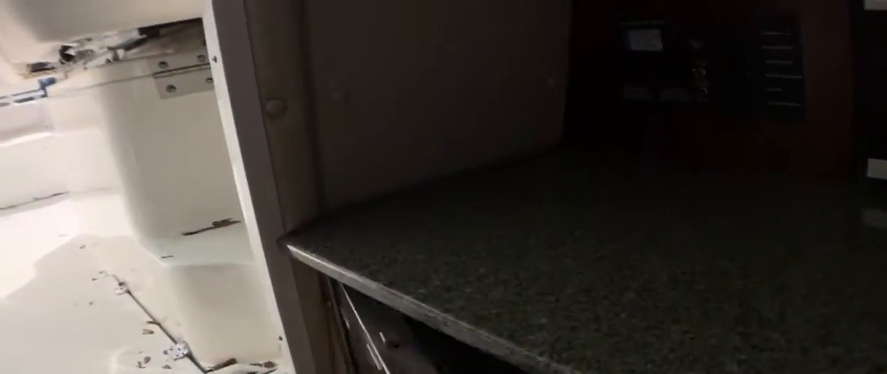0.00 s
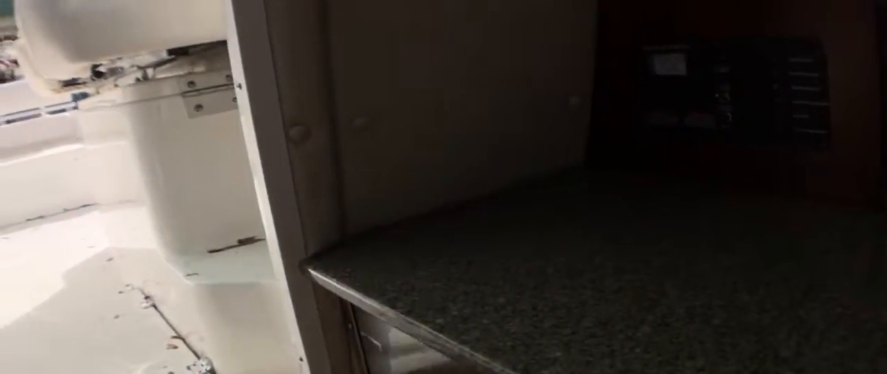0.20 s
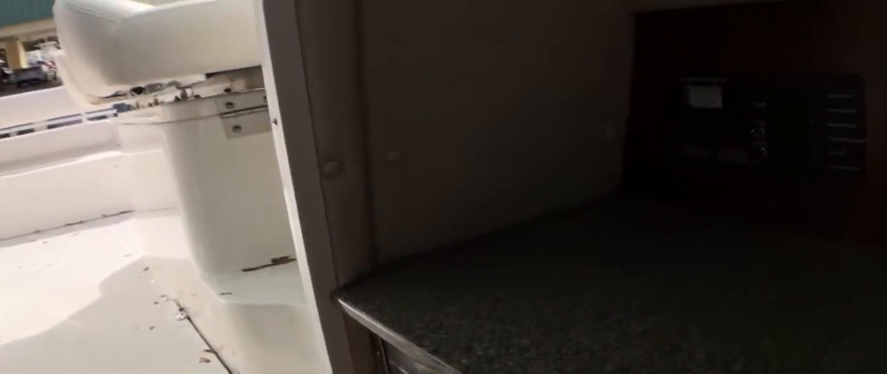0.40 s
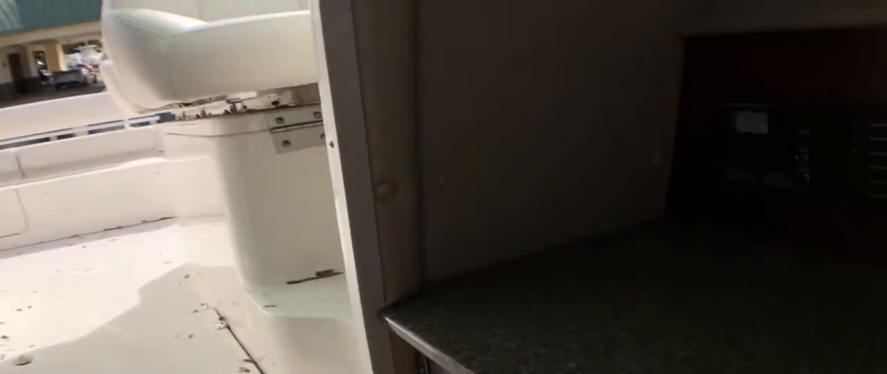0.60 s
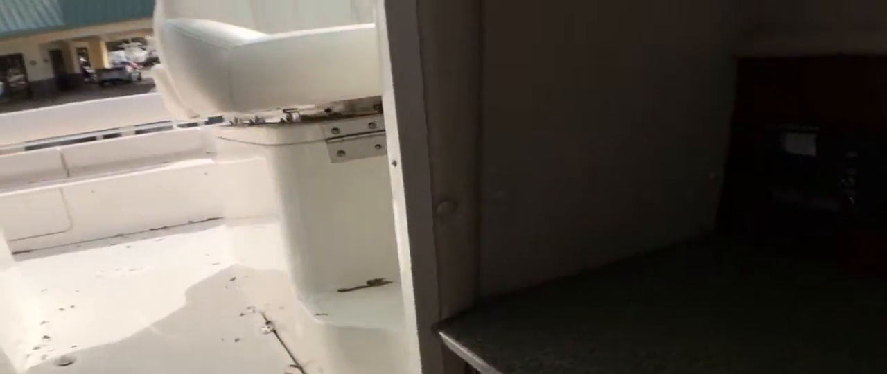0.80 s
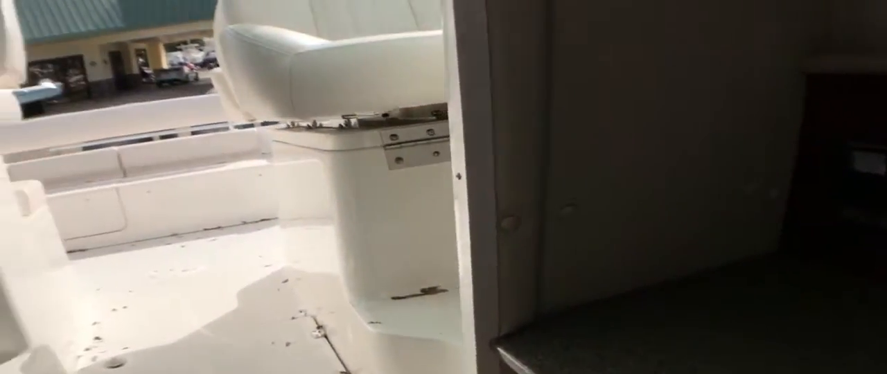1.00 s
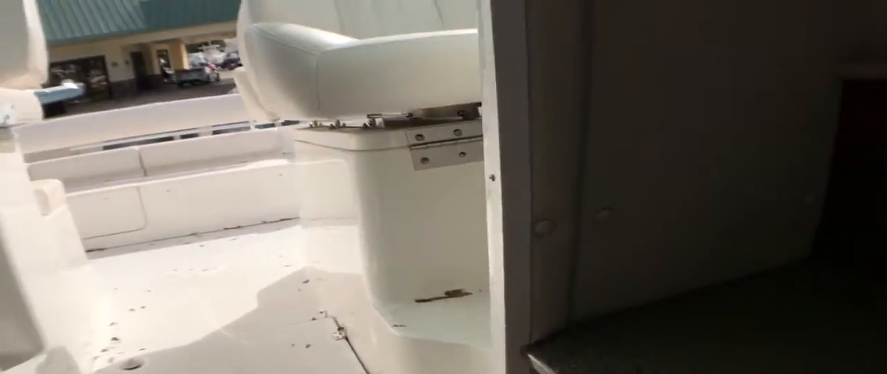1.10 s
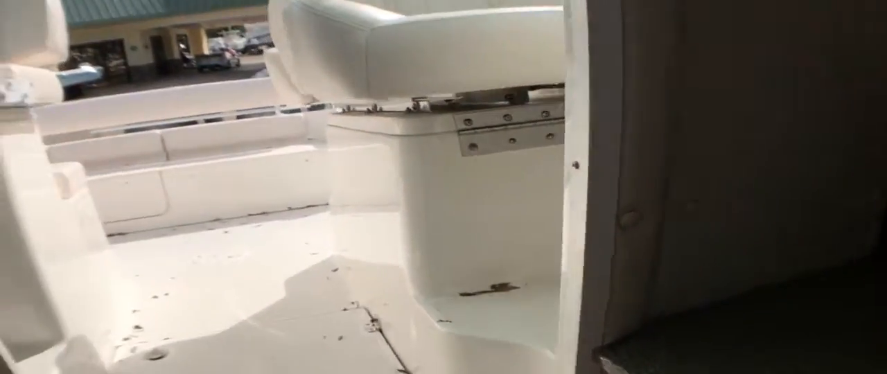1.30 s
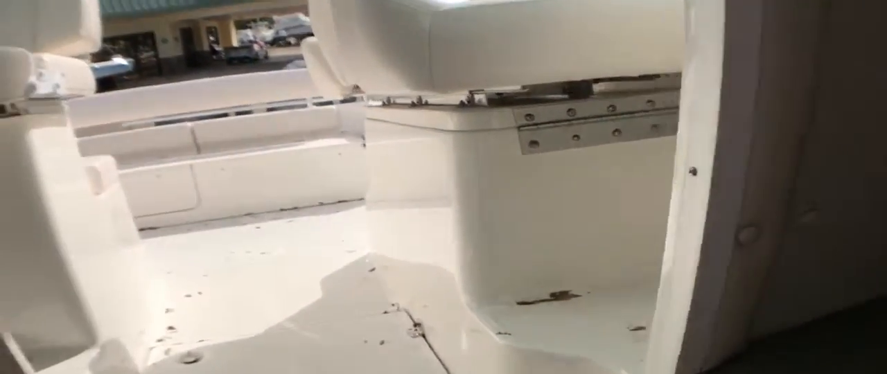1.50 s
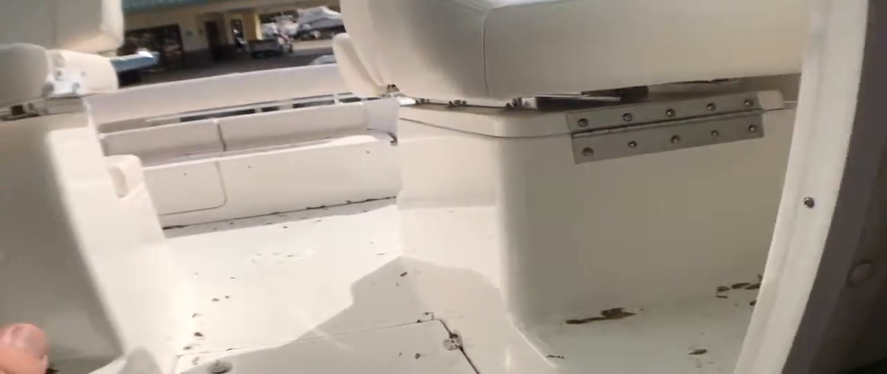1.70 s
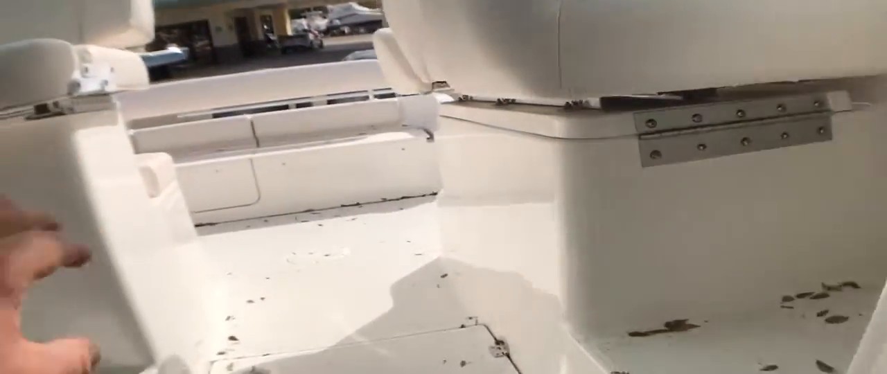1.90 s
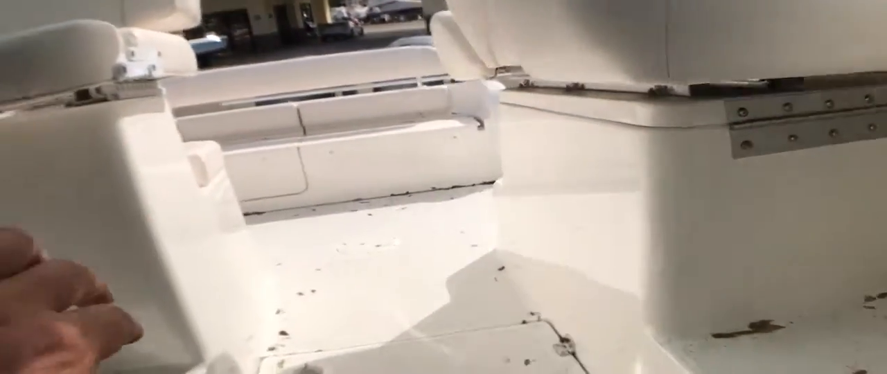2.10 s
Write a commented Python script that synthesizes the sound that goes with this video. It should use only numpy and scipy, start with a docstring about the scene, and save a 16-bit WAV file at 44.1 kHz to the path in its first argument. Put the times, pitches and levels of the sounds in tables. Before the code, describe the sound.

Close microphone in a tight, dry cabin: latch strike and deep panel thump, a bright latch snap just after, faint clothing rustle, soft deck footfalls with tiny clicks, low rumble and a distant car outside.

```python
"""In the small fiberglass cabin of a boat a locker door is pushed shut: its metal latch strikes, the
panel thumps home, the latch snaps in with a short ring. Someone steps towards the deck, clothing
brushing, footfalls soft, as the rumble and distant traffic outside grow and one far car passes.
Solid parts are decaying sine modes and noise bursts; cloth and the outside are shaped noise."""
import sys
import numpy as np
from scipy import signal
from scipy.fft import rfft, irfft
from scipy.io import wavfile
from scipy.ndimage import uniform_filter1d

SR = 44100
rng = np.random.default_rng(int(sys.argv[2]) if len(sys.argv) > 2 else 0)


def put_to_file(sound):
    """Save the sound as 16-bit audio at rate SR, in the file named by the first command-line argument."""
    columns = np.atleast_2d(sound).T  # one column per channel
    safe = np.clip(columns, -1, 1)
    whole_steps = np.round(safe * 32767)
    wavfile.write(sys.argv[1], SR, whole_steps.astype(np.int16))


N = 97020
CLOCK_S = np.arange(N) / SR
HIT_S = np.arange(round(0.7 * SR)) / SR  # time within one hit


def amp(db):
    """Decibels to gain."""
    return 10 ** (np.asarray(db) / 20)


def read(points, hz):
    """Interpolate a table along a log-frequency axis."""
    table_hz, value = np.transpose(points)
    return np.interp(np.log(hz + 1), np.log(table_hz), value)


def add(mix, start_s, sound):
    """Mix a sound in at start_s, cut at the end of the mix."""
    part = mix[max(round(start_s * SR), 0):][:len(sound)]
    part += sound[:len(part)]


def decay(t60_s):
    """Exponential decay: 60 dB down after t60_s."""
    return np.exp(-np.log(1000) * HIT_S / t60_s)


def rise(rise_s):
    """Exponential onset with time constant rise_s."""
    return 1 - np.exp(-HIT_S / rise_s)


def noise(colour, size):
    """Noise of rms 1 with the given spectrum."""
    spectrum = rfft(rng.standard_normal(size))
    gain = amp(read(colour, np.fft.rfftfreq(size, 1 / SR)))
    x = irfft(spectrum * gain, size)
    return x / x.std()


def wavering(colour, depth_db):
    """Noise of rms 1 whose bands swell and sink on their own."""
    z = signal.stft(noise(colour, N), nperseg=1024, noverlap=768)[2]
    patches = uniform_filter1d(rng.standard_normal(z.shape), size=4, axis=0)  # across frequency
    patches = uniform_filter1d(patches, size=20, axis=1)  # across time
    gain = amp(depth_db * patches / patches.std())
    x = signal.istft(z * gain, nperseg=1024, noverlap=768)[1][:N]
    return x / x.std()


# cabin reverberation: (band_hz, t60_s)
CABIN_DECAY = [(100, 0.68), (300, 0.24), (1000, 0.1), (3000, 0.13), (7000, 0.15), (15000, 0.14)]


def burst(colour, rise_s):
    """Dense ringing of the cabin after a blow, each band dying at its own speed."""
    spectrum = rfft(noise(colour, len(HIT_S)))
    hz = np.fft.rfftfreq(len(HIT_S), 1 / SR)
    centres_hz, t60s_s = np.transpose(CABIN_DECAY)
    out = np.zeros(len(HIT_S))
    for pick, t60_s in zip(np.eye(len(CABIN_DECAY)), t60s_s):
        weight = read(list(zip(centres_hz, pick)), hz)  # overlapping triangular bands
        out += irfft(spectrum * weight, len(HIT_S)) * decay(t60_s)
    return out * rise(rise_s)


def crack(colour, t60_s):
    """Hard contact: noise flattened to an even envelope, then decaying."""
    z = signal.hilbert(noise(colour, len(HIT_S)))
    even = np.sqrt(2) * (z / abs(z)).real
    return even * decay(t60_s)


def ring(modes, rise_s, tilt_db, shimmer):
    """Dying modes (hz, db, t60_s), tilted per octave; reflections waver each by the share shimmer."""
    out = np.zeros(len(HIT_S))
    middle_hz = np.median([mode[0] for mode in modes])
    for hz, db, t60_s in modes:
        waver = uniform_filter1d(rng.standard_normal((2, len(HIT_S))), size=400, axis=1)
        in_phase, quadrature = shimmer * waver / waver.std()
        turn = 2 * np.pi * hz * HIT_S
        tone = (1 + in_phase) * np.sin(turn) + quadrature * np.cos(turn)
        out += amp(db + tilt_db * np.log2(hz / middle_hz)) * decay(t60_s) * tone
    return out * rise(rise_s)


# noise spectra of rumble, traffic, one far car's tyres and hiss: (freq_hz, density_db)
RUMBLE_SPECTRUM = [(15, -9), (30, 1.5), (50, 2), (85, -1), (118, -2.5), (140, -10), (165, -25), (215, -10),
                   (290, -21), (420, -16), (700, -49.5), (2000, -81.5)]
TRAFFIC_SPECTRUM = [(100, -6), (350, -10.5), (560, -2), (830, 0.5), (1200, -3.5), (2000, -10.5),
                    (3200, -17), (5000, -25.5), (10000, -30), (16000, -32)]
TYRE_SPECTRUM = [(300, -19), (600, -3), (850, -0.5), (1150, 0.5), (1400, -8), (2000, -19), (5000, -46)]
HISS_SPECTRUM = [(1000, -31), (2500, -5), (5000, -7), (10000, -12), (16000, -15.5)]
# hiss level over time: (time_s, level_db)
HISS_ENVELOPE = [(0, -62.5), (.5, -58), (1.1, -64), (1.22, -74), (1.7, -63.5), (2.2, -71)]
RUMBLE_START_DB, RUMBLE_DB_PER_S = -38.5, 1
TRAFFIC_START_DB, TRAFFIC_DB_PER_S = -48.5, 0.5
CAR_NEAREST_S, CAR_HALF_S, CAR_DB = 1.87, 0.18, -48.5


def outside():
    """Rumble and far traffic grow towards the doorway over faint hiss; a car fades with distance."""
    rumble = noise(RUMBLE_SPECTRUM, N) * amp(RUMBLE_START_DB + RUMBLE_DB_PER_S * CLOCK_S)
    traffic = wavering(TRAFFIC_SPECTRUM, depth_db=1.5)
    traffic *= amp(TRAFFIC_START_DB + TRAFFIC_DB_PER_S * CLOCK_S)
    distance = np.hypot(1, (CLOCK_S - CAR_NEAREST_S) / CAR_HALF_S)  # 1 at the nearest moment
    car = wavering(TYRE_SPECTRUM, depth_db=1) * amp(CAR_DB) / distance
    hiss_db = np.interp(CLOCK_S, *np.transpose(HISS_ENVELOPE))
    return rumble + traffic + car + noise(HISS_SPECTRUM, N) * amp(hiss_db)


# latch hits, on the plate then springing in: (start_s, ring_db, rattle_db, thud_db)
LATCH_STRIKES = [(0.218, -29, -26, -20.5), (0.406, -22.5, -32, -42)]
# modes of metal latch and mount: (pitch_hz, t60_s, pressed_db, free_db)
LATCH_MODES = [(408, 0.14, 8, -18), (505, 0.11, 10, -22), (1750, 0.14, 1.5, -17.5), (2164, 0.06, 5.5, -13),
               (2560, 0.087, 4, -34), (3117, 0.19, -30, -19), (4220, 0.18, -9, -10.5),
               (4385, .17, -13, -11.5), (5320, 0.23, -10, -13), (5430, 0.045, -4, -7),
               (5730, 0.032, 7.5, -22), (6120, .11, -9, -1.5), (6245, 0.12, -16, -12),
               (8610, .19, -12, -9.5), (8760, 0.022, 0, 4), (9420, 0.15, -11, -9), (9555, 0.16, -10, -6.5),
               (11410, 0.13, -7.5, -2.5), (12880, 0.17, -16, -15), (13900, .1, -16, -18),
               (15000, 0.12, -10, -6)]
# rattle and thud spectra: (freq_hz, density_db)
RATTLE_SPECTRUM = [(200, -18), (600, 1), (1200, 6), (2200, 0), (3600, -0.5), (6000, -9), (7500, -6.5),
                   (12000, -25), (16000, -6)]
THUD_SPECTRUM = [(60, 2), (150, -12.5), (280, -5), (520, -18), (800, -15), (3000, -53)]
# latch squeaking over its plate: (start_s, length_s, pitch_hz, level_db)
LATCH_SQUEAKS = [(0.23, 0.011, 5440, -31.5), (0.23, .031, 11390, -38)]
LATCH_RISE_S = 0.012


def latch():
    """The latch hits its plate, squeaks as it slides over it, then springs in and rings freely."""
    out = np.zeros(N)
    for k, (start_s, ring_db, rattle_db, thud_db) in enumerate(LATCH_STRIKES):
        modes = [(hz, levels_db[k], t60_s) for hz, t60_s, *levels_db in LATCH_MODES]
        add(out, start_s, amp(ring_db) * ring(modes, LATCH_RISE_S, 0, shimmer=0.73))
        add(out, start_s, amp(rattle_db) * burst(RATTLE_SPECTRUM, 0.001))
        add(out, start_s, amp(thud_db) * burst(THUD_SPECTRUM, 0.0094))
    for start_s, length_s, hz, level_db in LATCH_SQUEAKS:
        t = HIT_S[HIT_S < length_s]
        swell = np.sqrt(np.sin(np.pi * t / length_s))
        add(out, start_s, amp(level_db) * swell * np.sin(2 * np.pi * hz * t))
    return out


# spectra of edge touch, crack and cabin clatter: (freq_hz, density_db)
SEAL_SPECTRUM = [(200, -6), (700, -2), (2500, -11), (4500, -14), (8000, -25), (16000, -38)]
CRACK_SPECTRUM = [(300, -18), (1500, -10), (2800, -13), (3800, 9), (4900, -5), (9000, -21), (11000, -22),
                  (16000, -33)]
CLATTER_SPECTRUM = [(120, -20), (260, 1.5), (550, -7), (1100, -3), (2100, -3), (4200, -12), (5000, -15.5),
                    (9300, -24.5), (10500, -27), (16000, -29)]
# modes of hard door frame; of panel and cabinet: (pitch_hz, level_db, t60_s)
FRAME_MODES = [(667, -11, 0.36), (951, -2, 0.18), (1340, -12, 0.29), (1588, -11, .17), (2050, -0.5, .14),
               (2780, -0.5, 0.087), (3269, -1.5, 0.11), (3800, 2, 0.011), (4280, -6, .08)]
PANEL_MODES = [(36.4, -10.5, 0.52), (55.8, -6.5, 0.34), (71.6, 2, 0.1), (82.84, -19.5, 0.72),
               (96.4, -12, 0.33), (112, -11, 0.11), (163, -11, .06), (189, -24.5, 0.4), (225, -8, .09),
               (266.7, -25, 0.32), (283, -23, 0.086), (360, -18, 0.071), (349.5, -26.5, 0.2),
               (388.4, -24.5, .19)]
DOOR_S, SEAL_LEAD_S, PANEL_LAG_S = 0.2618, 0.006, 0.00747
SEAL_DB, CRACK_DB, CLATTER_DB, FRAME_DB, PANEL_DB, SHAKEN_DB = -23, -10, -15, -25, -2, -23.5
CRACK_T60_S, PANEL_RISE_S, SHAKEN_TILT_DB_PER_OCTAVE = 0.012, 0.0038, -3


def door():
    """The edge touches, the door cracks against its frame, the panel booms and shakes the latch."""
    out = np.zeros(N)
    add(out, DOOR_S - SEAL_LEAD_S, amp(SEAL_DB) * burst(SEAL_SPECTRUM, 0.0004))
    add(out, DOOR_S, amp(CRACK_DB) * crack(CRACK_SPECTRUM, CRACK_T60_S))
    add(out, DOOR_S, amp(CLATTER_DB) * burst(CLATTER_SPECTRUM, 0.0037))
    add(out, DOOR_S, amp(FRAME_DB) * ring(FRAME_MODES, 0.00033, 0, shimmer=0.42))
    panel = ring(PANEL_MODES, PANEL_RISE_S, 0, shimmer=0)
    add(out, DOOR_S + PANEL_LAG_S, amp(PANEL_DB) * panel)
    modes = [(hz, pressed_db, t60_s) for hz, t60_s, pressed_db, _ in LATCH_MODES if 4000 < hz < 10500]
    shaken = ring(modes, LATCH_RISE_S, SHAKEN_TILT_DB_PER_OCTAVE, shimmer=0.23)
    add(out, DOOR_S, amp(SHAKEN_DB) * shaken)
    return out


# clothing brushes, Gaussian swells: (middle_s, sigma_s, level_db, tilt_db_per_octave)
CLOTH_BRUSHES = [(.6, 0.21, -87, 1), (0.885, 0.17, -56.5, 1), (1.06, .07, -47, 1), (1.954, 0.086, -57, 3)]
# cloth spectrum before tilt: (freq_hz, density_db)
CLOTH_SPECTRUM = [(300, 8), (600, -6), (1300, -5), (2500, -3.5), (4000, -13), (7000, -18.5), (10000, -22.5),
                  (15000, -25)]


def clothing():
    """Cloth slides in short grainy swells, some brighter than others."""
    out = np.zeros(N)
    for middle_s, sigma_s, level_db, tilt_db in CLOTH_BRUSHES:
        colour = [(hz, db + tilt_db * np.log2(hz)) for hz, db in CLOTH_SPECTRUM]
        swell = np.exp(-0.5 * ((CLOCK_S - middle_s) / sigma_s) ** 2)
        out += amp(level_db) * swell * noise(colour, N)
    grain = uniform_filter1d(rng.standard_normal(N), size=400)
    return out * amp(2.2 * grain / grain.std())  # 2.2 dB rms


# footfalls: (start_s, level_db, rise_s, tilt_db_per_octave)
FOOTFALLS = [(1.306, -29.5, 0.017, 2), (1.369, -35, 0.0039, 5.5), (1.424, -28.5, 0.0037, 3),
             (1.64, -34.5, 0.016, 4.5), (2.095, -36, 0.0071, -11.5), (2.159, -33.5, 0.0053, 0)]
# hollow deck modes: (pitch_hz, level_db, t60_s)
DECK_MODES = [(37, -0.5, 0.24), (60.2, -6.5, 0.53), (76, 1.5, 0.31), (115.3, 0, 0.34), (205.3, -16.5, 0.55),
              (241.8, -19.5, 0.75), (296, -14.5, 0.26)]
# small clicks of sole and deck: (start_s, level_db, attack_db)
SOLE_CLICKS = [(1.316, -62, -8), (1.4042, -47, -1), (1.4163, -39, 2.5), (1.429, -46.5, 3.5),
               (1.5035, -51, -4), (1.596, -51, -4)]
# click spectrum: (freq_hz, density_db)
CLICK_SPECTRUM = [(300, -18), (1500, 3), (2100, -7.5), (2700, -0.5), (3200, -1), (3750, -2), (4600, -5),
                  (8000, -9), (15000, -8.5)]
# click modes: (pitch_hz, level_db, t60_s)
CLICK_MODES = [(2055, -7.5, 0.15), (2660, -4.5, 0.065), (3690, 4, 0.036)]


def footsteps():
    """Soft steps boom in the hollow deck; the sole and the deck click under the weight."""
    out = np.zeros(N)
    for start_s, level_db, rise_s, tilt_db in FOOTFALLS:
        add(out, start_s, amp(level_db) * ring(DECK_MODES, rise_s, tilt_db, shimmer=0.18))
    for start_s, level_db, attack_db in SOLE_CLICKS:
        attack = crack(CLICK_SPECTRUM, 0.026)
        attack += amp(-4.5) * ring(CLICK_MODES, 0.00035, 0, shimmer=0.49)
        click = amp(attack_db) * attack + burst(CLICK_SPECTRUM, 0.0019)
        add(out, start_s, amp(level_db) * click)
    return out


def scene():
    """All sources at one microphone."""
    return (outside() + latch() + door() + clothing() + footsteps())[None]


EDGE_HZ = 15900


def record(dry):
    """The microphone drops the deepest bass; a steep low-pass then limits the band."""
    highpass = signal.butter(2, 18, "highpass", fs=SR, output="sos")
    thin = signal.sosfilt(highpass, dry)
    lowpass = signal.firwin(511, EDGE_HZ, window=("kaiser", 9), fs=SR)
    return signal.oaconvolve(thin, lowpass[None], "same")


dry = scene()
out = record(dry)
put_to_file(out)
```